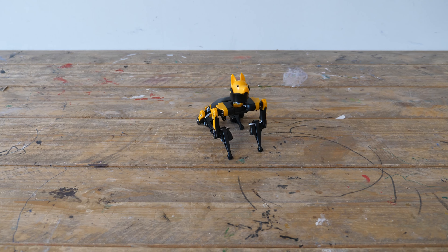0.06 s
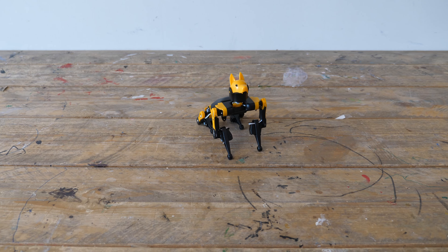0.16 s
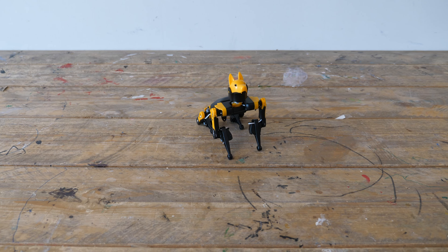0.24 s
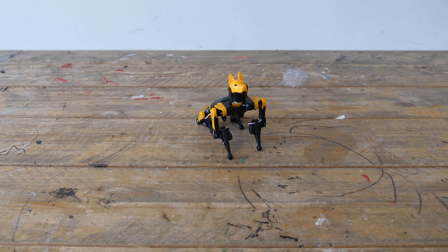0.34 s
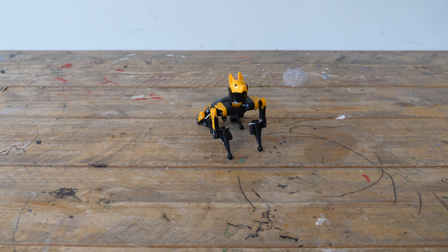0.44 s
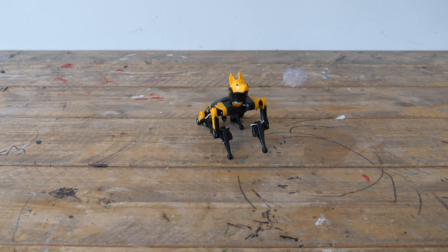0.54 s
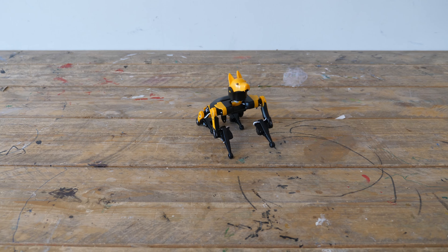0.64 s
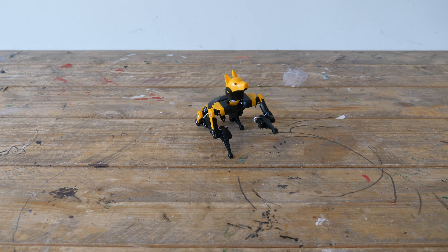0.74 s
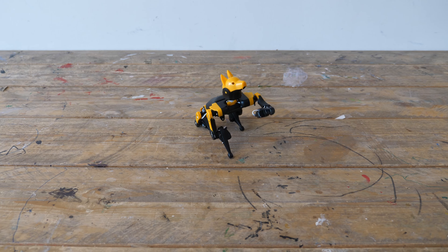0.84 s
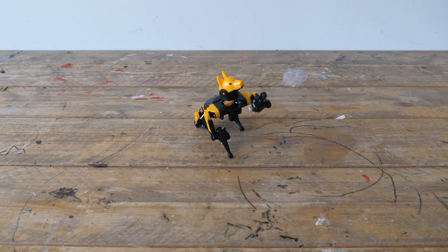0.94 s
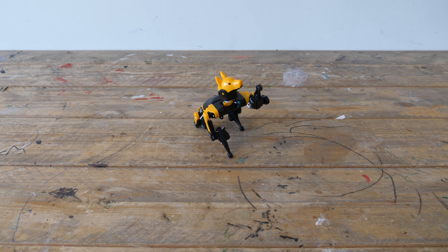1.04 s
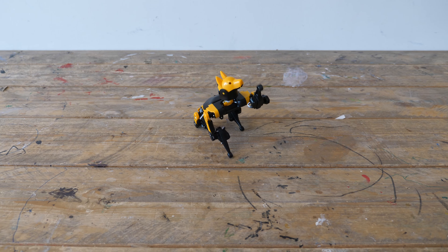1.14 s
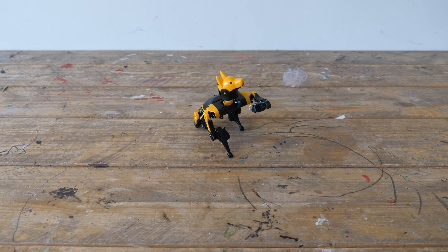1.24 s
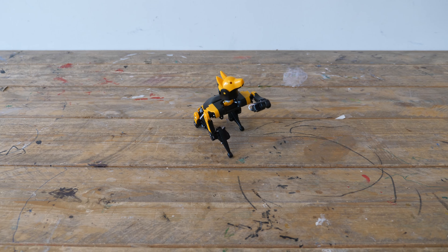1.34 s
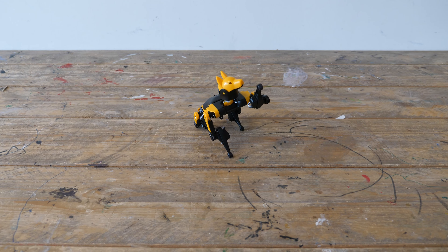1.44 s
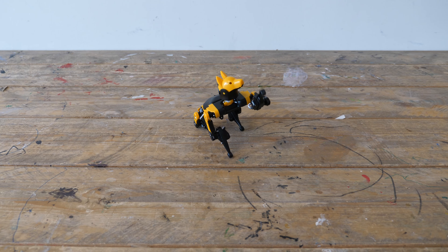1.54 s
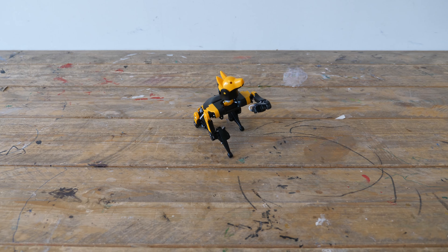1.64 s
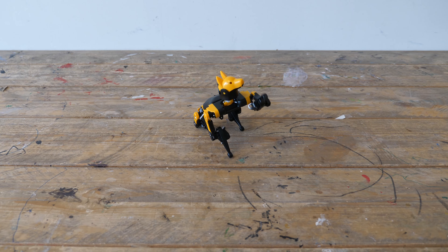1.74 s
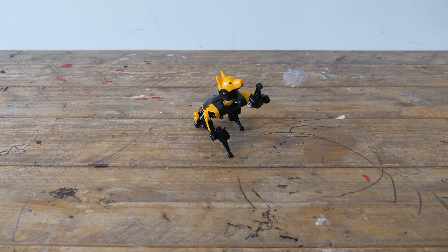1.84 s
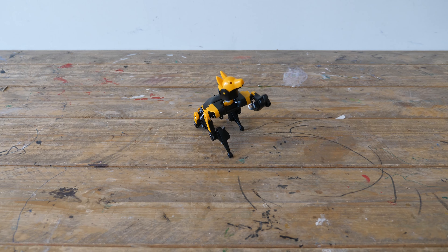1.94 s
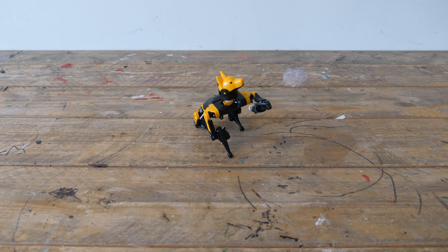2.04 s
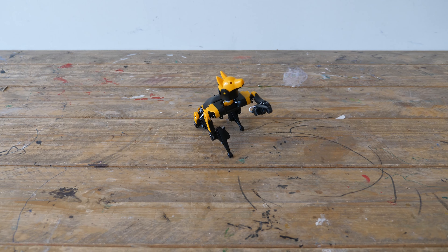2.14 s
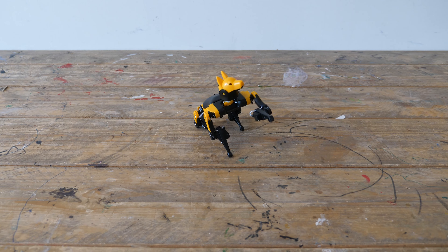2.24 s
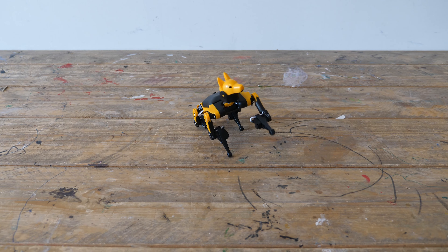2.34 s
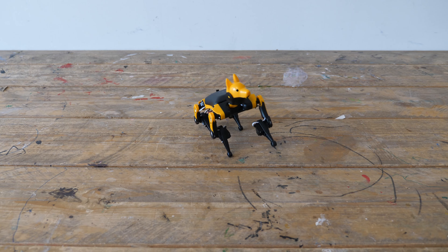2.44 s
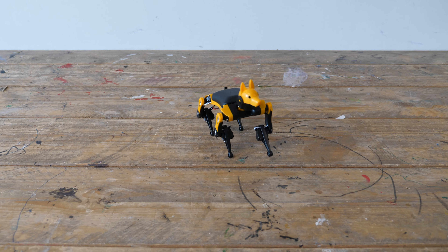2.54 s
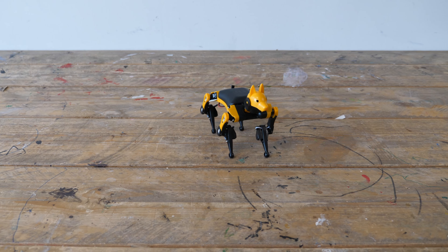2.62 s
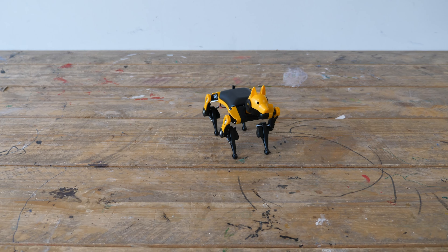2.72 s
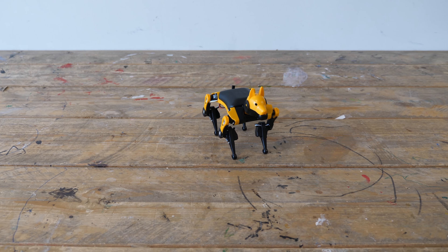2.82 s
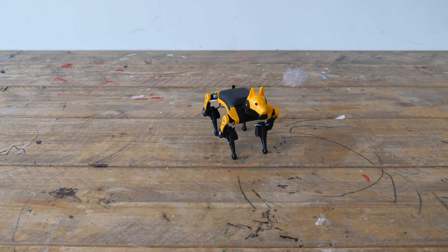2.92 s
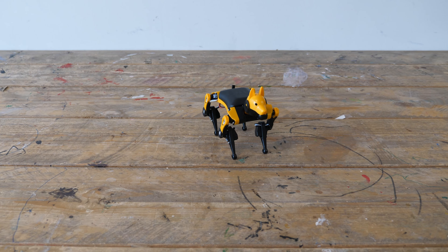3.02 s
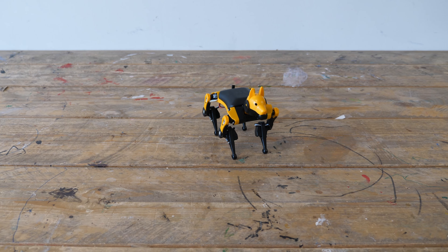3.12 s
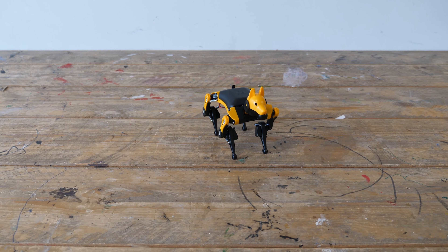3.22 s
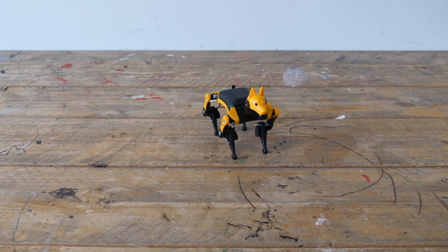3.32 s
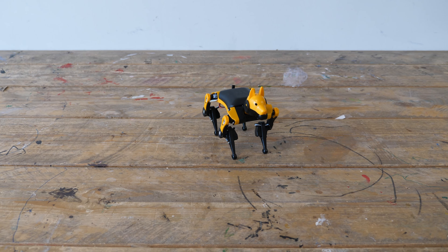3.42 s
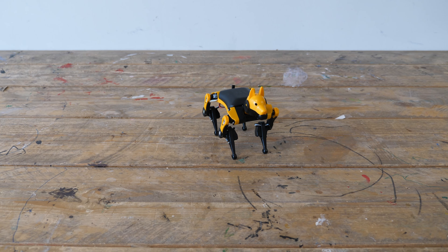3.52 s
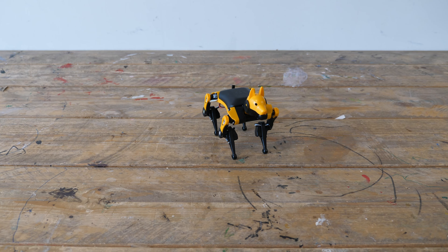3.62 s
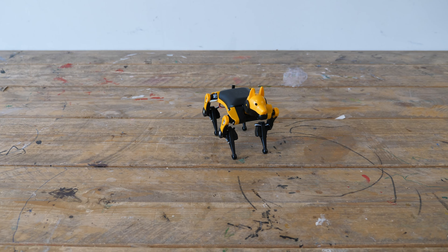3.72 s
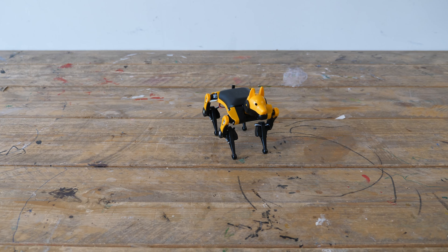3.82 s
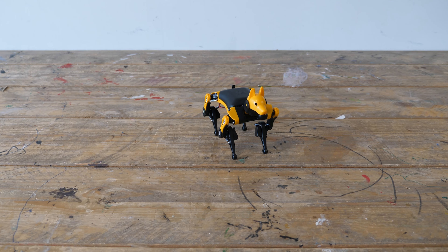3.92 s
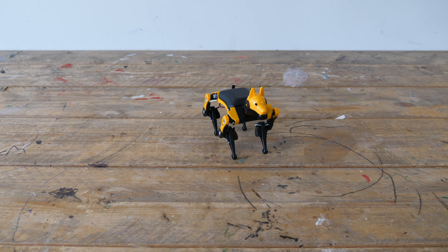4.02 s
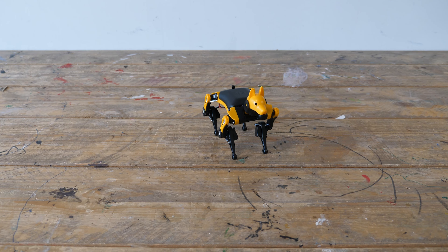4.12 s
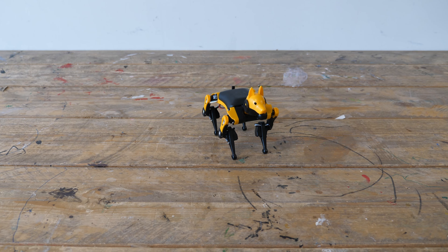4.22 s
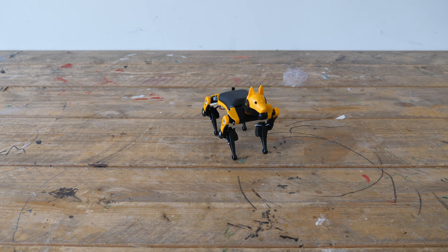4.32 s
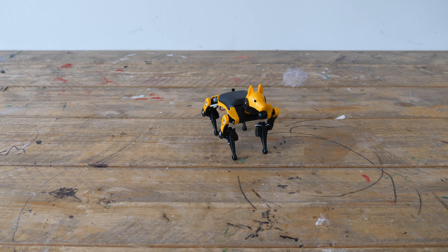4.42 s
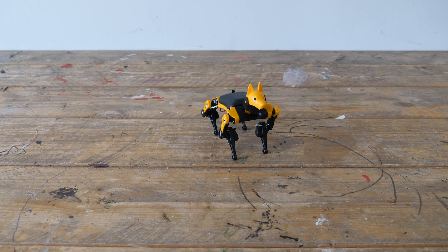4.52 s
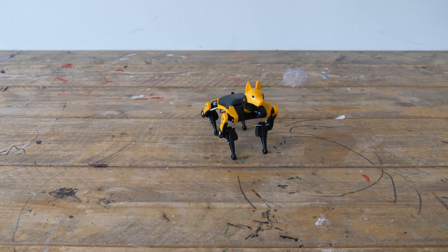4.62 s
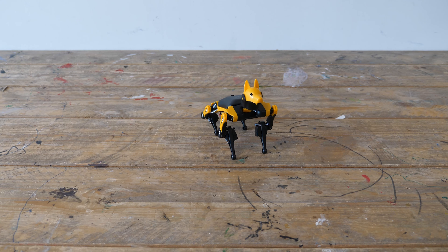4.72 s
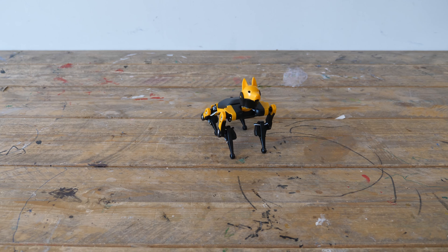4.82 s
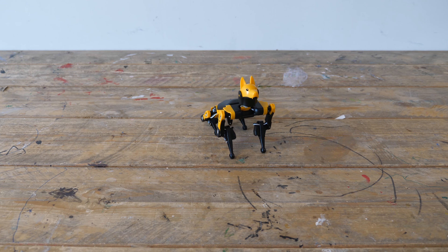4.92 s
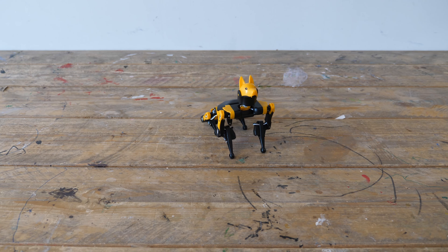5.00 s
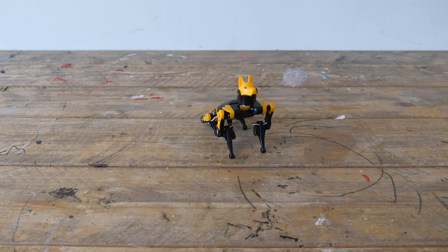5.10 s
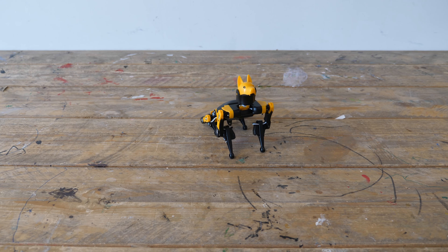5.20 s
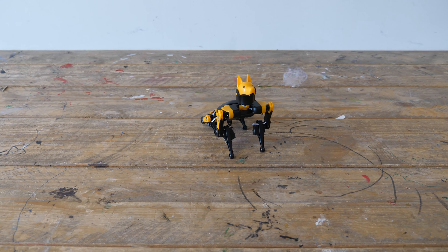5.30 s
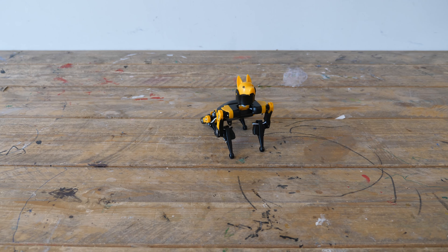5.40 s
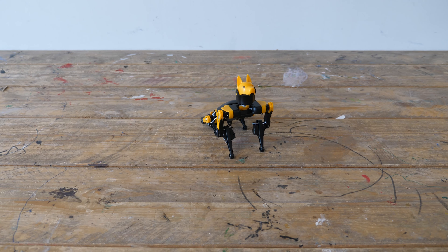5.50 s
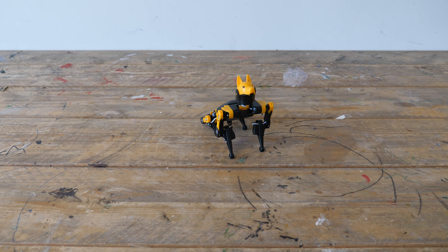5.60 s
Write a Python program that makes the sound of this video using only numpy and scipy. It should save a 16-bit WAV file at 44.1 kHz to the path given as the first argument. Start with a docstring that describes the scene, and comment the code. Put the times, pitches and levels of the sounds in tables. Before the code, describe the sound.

A small robot dog moves on a wooden table in a quiet room. A high, raspy servo whir swells as it lifts a leg, followed by five quick buzzing pulses as it waves. Another whir ends in a rattling knock as its plastic feet land. After a short pause a joint snaps once, and a softer whir with faint foot scuffs follows as it sits back. The sound is centred and fairly dry.

```python
"""A foot stutters faintly over a wooden table, then servos whirr: a small robot dog lifts a front leg,
waves it five times, drops onto all fours and sits back. Gear teeth chatter in plastic housings,
throbbing once a turn, and hum through the frame. Feet scuff and land on the ringing table top,
slack gears tick, a joint snaps once, and the quiet room adds a short tail and a low rumble."""
import sys
import numpy as np
from scipy import signal
from scipy.fft import rfft, irfft
from scipy.io import wavfile

SR = 44100
rng = np.random.default_rng(int(sys.argv[2]) if len(sys.argv) > 2 else 0)


def store_pcm(level_fs):
    """Save levels as 16-bit WAV."""
    pcm = np.round(np.clip(level_fs, -1, 1) * 32767).astype(np.int16)
    wavfile.write(sys.argv[1], SR, np.atleast_2d(pcm).T)


N = 249247
TIME = np.arange(N) / SR


# resonances of the frame standing on the table: pitch_hz, width_hz, level_db
FRAME_MODES = [(64.5, 31, 2.5), (124.5, 22, 8.5), (248, 136, 1), (465, 21, 5.5), (515.4, 5.2, 11.5),
               (666, 52, -12), (834, 44, -6.5), (1074, 50, -3.5), (1338, 15.6, -0.5), (1940, 180, -25)]

def servo(level_db, speed, colour, throb_db, hum_db, whine_db, overtone_db, hum_slope, teeth=24):
    """Gears rattle in the housing, hardest once a turn (speed in turns/s), and shake the frame."""
    size = len(speed)
    turns = np.cumsum(speed * (1 + 0.00816 * drift(60.6, size))) / SR
    tight_spot = np.cos(np.pi * turns) ** 4 * np.sqrt(speed / speed.max())
    flutter_db = 1.36 * drift(170, size)
    throb = rms_one(from_db(throb_db * tight_spot + flutter_db))
    rattle = grains(size, spread_db=2.5)
    mesh_phase = 2 * np.pi * teeth * turns + .6 * drift(110, size)   # uneven teeth blur the tone
    overtones = from_db(overtone_db) * (np.sin(mesh_phase) + np.sin(3 * mesh_phase))
    chatter = cut(coloured((rattle + overtones) * throb * from_db(level_db), colour), 550, "high")
    hum = from_db(hum_db) * rattle + from_db(whine_db) * np.sin(mesh_phase)
    shake = hum * throb * from_db(hum_slope * level_db)
    return chatter + sum(from_db(db) * resonate(shake, hz, width) for hz, width, db in FRAME_MODES)


def move(row, colour, creep_turns_per_s=12, db_per_decade=34, **voicing):
    """A servo runs up, cruises and eases off; its level follows its speed under an uneven load."""
    start, run_up, cruise, run_down, top_speed, db = row
    out, age = np.zeros(N), span(0, run_up + cruise + run_down)
    ease_in = np.sin(np.pi / 2 * ramp(age, run_up))
    ease_out = np.cos(np.pi / 2 * ramp(age - run_up - cruise, run_down)) ** 2
    speed = creep_turns_per_s + (top_speed - creep_turns_per_s) * ease_in * ease_out
    load_db = 1.78 * drift(30, len(age))
    level_db = db + db_per_decade * np.log10(speed / top_speed) + load_db
    add(out, start, servo(level_db, speed, colour, hum_slope=0.56, **voicing))
    return out


# slow leg moves: start_s, run_up_s, cruise_s, run_down_s, top_turns_per_s, level_db
LEG_MOVES = [(0.0, 0.0034, 0.037, 0.32, 41, -56.5), (.462, .36, 0.044, 0.32, 73, -39.5),
             (2.16, .29, .15, 0.33, 59, -40), (4.15, .56, .16, .52, 48, -47.5),
             (5.35, 0.054, 0.0081, 0.085, 28, -62)]
# EQ of the servo housings while lifting, lowering and sitting: frequency_hz, relative_db
LIFT_EQ = [(900, -12), (1800, -17.5), (2300, -16), (3700, -14.5), (4600, -9), (5450, -1), (6550, -11.5),
           (7100, -9.5), (7450, -7), (8100, -1.5), (9100, -11), (11000, -21.5), (13200, -17.5),
           (15800, -24)]
LOWER_EQ = [(900, -7), (1800, -12), (2700, -7.5), (3600, -12.5), (4500, -2.5), (5600, -2.5), (6500, -7.5),
            (7400, -2), (8400, 1), (9600, -10), (10300, -7), (11400, -12), (12700, -6.5), (15800, -11)]
SIT_EQ = [(900, -1), (2100, -9), (2900, 0), (3400, -3.5), (3800, -0.5), (4600, 2.5), (5300, 2.5),
          (6400, -5), (7600, 1.5), (8600, 2.5), (9600, -9.5), (11200, -8.5), (12700, -4), (15800, -13.5)]

def legs():
    """Five slow servo moves; the lifting shoulder binds once a turn and throbs the most."""
    settle, lift, lower, sit, nudge = LEG_MOVES
    return (move(settle, SIT_EQ, throb_db=1, hum_db=-11.5, whine_db=-47, overtone_db=-17)
            + move(lift, LIFT_EQ, throb_db=7, hum_db=-15, whine_db=-32, overtone_db=-15.5)
            + move(lower, LOWER_EQ, throb_db=4, hum_db=-18, whine_db=-31, overtone_db=-26)
            + sum(move(row, SIT_EQ, throb_db=3.5, hum_db=-14.5, whine_db=-31, overtone_db=-22.5)
                  for row in (sit, nudge)))


# strokes of the waving paw: start_s, level_db, run_up_s
PAW_STROKES = [(1.211, -43.5, 0.011), (1.394, -41, .033), (1.577, -42.5, .02), (1.769, -41, .031),
               (1.953, -42.5, 0.021)]
# EQ of the servo housing while waving: frequency_hz, relative_db
WAVE_EQ = [(900, -17.5), (1900, -13), (2900, -11.5), (3500, -14), (4600, -8), (5550, 0), (6550, -14.5),
           (7400, -8.5), (8200, 1.5), (9000, -8.5), (9800, -12), (11200, -10), (13000, -15), (15800, -14)]

def waving(drive_s=.075, brake_s=.012, coast_s=.085, rise_db=12.5, sag_db_per_s=55, fade_db_per_s=274):
    """Each paw stroke swells quickly, sags under drive, brakes and coasts away with a wavering hum."""
    out = np.zeros(N)
    braking, coasting, end = np.cumsum([drive_s, brake_s, coast_s])
    age = span(0, end)
    turns_per_s = np.interp(age, [braking, coasting, end], [58, 21, 20.8])
    fall_db = sag_db_per_s * np.minimum(age, coasting) + fade_db_per_s * np.maximum(age - coasting, 0)
    for start, db, run_up in PAW_STROKES:
        level_db = db - rise_db * (1 - ramp(age, run_up)) - fall_db
        speed = turns_per_s * (1 + .025 * drift(45, len(age)))
        add(out, start, servo(level_db, speed, WAVE_EQ, throb_db=3.5, hum_db=-22.5,
                              whine_db=-37, overtone_db=-27, hum_slope=0.41))
    return out


def foot_contacts(start_s, count=8, first_gap_s=.0013, spread=1.36, hard_hz=5200, soft_hz=950):
    """Landing feet chatter: contacts build as the weight arrives, then spread out, weaken and soften."""
    lags = np.append(0, np.cumsum(first_gap_s * spread ** np.arange(count - 1)))
    level_db = -1 + 5 * ramp(lags, length_s=0.0021) - 480 * lags
    hardness_hz = soft_hz + (hard_hz - soft_hz) * np.exp(-lags / 0.01)
    return list(zip(start_s + lags, level_db, hardness_hz))


# the body rocking back onto its feet: start_s, relative_db, hardness_hz
REBOUND_HITS = [(2.735, -8, 806), (2.758, -20, 600), (2.7815, 0, 880), (2.81, -29, 688)]
# dead knock of a plastic leg: frequency_hz, relative_db
KNOCK_EQ = [(50, -5), (150, 0), (400, 5.5), (900, 9), (1600, -1), (2800, 1.5), (4300, 6), (5500, -24),
            (9000, -20), (16000, 2.5)]

def landing(land_s=2.6768, tip_s=.14, judder_s=.25, fade_db_per_s=102):
    """Feet hit and rebound; the loose frame judders lightly as it tips, then hard on landing."""
    blows, judder = np.zeros(N), np.zeros(N)
    for start, db, hardness_hz in foot_contacts(land_s) + list(REBOUND_HITS):
        add(blows, start, from_db(db) * cut(signal.unit_impulse(SR // 100), hardness_hz, "low"))
    t = span(land_s - tip_s, land_s + judder_s)
    judder_db = np.where(t < land_s, -40.5, -25.5 - fade_db_per_s * (t - land_s))
    rattle = from_db(judder_db) * grains(len(t), spread_db=8.5)
    add(judder, t[0], cut(rattle, 650, "low", order=1))
    knock = coloured(blows + from_db(2) * judder, KNOCK_EQ)
    return from_db(-3) * knock + from_db(-45) * table_top(blows + judder)


# feet stuttering over the wood: start_s, relative_db, pitch_hz, slip_count
FOOT_SCUFFS = [(0.0, -50.5, 780, 5), (.662, -32.5, 940, 1), (1.081, -49.5, 780, 1), (2.193, -47.5, 830, 2),
               (2.536, -38.5, 690, 2), (4.152, -43.5, 780, 1), (4.312, -43.5, 780, 1),
               (4.737, -43.5, 880, 1), (4.853, -50, 880, 1), (5.132, -47.5, 645, 1), (5.221, -46.5, 785, 1),
               (5.424, -51.5, 810, 1)]

def scuffs(slip_s=0.033, gap_s=0.056, loss_db=2, width_hz=215, trim_db=-5):
    """A foot sticks and slips: each train of small impacts rings the leg and pushes on the table."""
    leg_ring, push, age = np.zeros(N), np.zeros(N), TIME[:SR // 8]
    envelope = np.interp(age, [0, .012, slip_s, slip_s + .03], [0.62, 0.81, 0.54, 0.1])
    for start, db, hz, count in FOOT_SCUFFS:
        for k in range(round(count)):
            at = start + k * gap_s
            friction = grains(len(age), spread_db=9.4)
            pressure = from_db(db + trim_db - k * loss_db) * envelope
            squeak = resonate(resonate(friction, hz, width_hz), hz, 2 * width_hz)
            add(leg_ring, at, pressure * rms_one(squeak))
            add(push, at, pressure * rms_one(cut(friction, 420, "low")))
    return leg_ring + from_db(-59) * table_top(leg_ring + from_db(3) * push)


# ring of the wooden table top: pitch_hz, relative_db, t60_s
TABLE_MODES = [(79, -11, 0.37), (121.6, -13, 0.75), (320, 2, 0.56), (475.4, -4.5, 0.25), (517.8, 0, 0.4),
               (648, 8, 0.048), (697, -6.5, 0.32), (761, 3, 0.24), (795, 3.5, 0.14), (829, 5.5, 0.4),
               (878, -3, 0.16), (1050, 11.5, 0.069), (1175, -3.5, 0.21), (1350, 0.5, 0.15),
               (1490, 1.5, 0.067), (1555, 3, 0.098), (1980, -12, 0.12), (2310, -32, 0.061)]

def table_top(force):
    """The boards ring under the feet."""
    return ring_modes(force, TABLE_MODES)


# catches within the snap of a joint: start_s, relative_db
SNAP_CATCHES = [(3.9816, -4), (3.9847, -2.5), (3.9891, -4), (3.9926, -4.5), (3.9937, -4.5)]
# ring of the snapping part: pitch_hz, relative_db, t60_s
JOINT_MODES = [(1870, -24.5, 0.05), (2700, -40, .012), (2840, -27, .012), (3190, 1.5, 0.017),
               (3590, 5, 0.0085), (3740, 8, 0.0069), (4160, -5.5, 0.0055), (5610, -6.5, 0.016),
               (6010, 1, 0.012), (6100, -0.5, 0.0092), (6845, -5.5, 0.0087), (7460, -5.5, 0.013),
               (8770, -9, 0.021)]

def joint_snap(trim_db=-28, grit=0.21):
    """A joint slips over several catches within milliseconds, each setting it ringing."""
    force = np.zeros(N)
    for start, db in SNAP_CATCHES:
        add(force, start, from_db(db) * (signal.unit_impulse(SR // 20) + grit * burst(decay_s=0.0007)))
    snap = cut(ring_modes(force, JOINT_MODES), 720, "high")
    return from_db(trim_db) * cut(snap, 6900, "low", order=4)


# lone ticks of slack gears: start_s, relative_db
GEAR_TICKS = [(.465, -52.5), (1.1877, -54), (2.1588, -52), (2.7137, -48), (2.7282, -33), (2.8966, -50),
              (2.973, -51), (3.035, -48), (3.8806, -56.5), (5.2106, -38.5), (5.4244, -53)]

def backlash(trim_db=2.5):
    """Slack teeth knock together in the housing, in lone ticks and as each paw stroke ends its run-up."""
    out = np.zeros(N)
    stroke_ticks = [(start + run_up, -46) for start, _, run_up in PAW_STROKES]
    for start, db in list(GEAR_TICKS) + stroke_ticks:
        add(out, start, from_db(db + trim_db) * burst(decay_s=0.0013))
    return cut(coloured(out, LOWER_EQ), 1700, "high")


def reverb(x, t60_s=0.32, predelay_s=.006, wet_db=-19):
    """A diffuse tail from the walls follows the direct sound."""
    age = TIME[:SR // 2]
    decay = np.exp(-np.log(1000) * age / t60_s) * (age > predelay_s)
    tail = cut(noise(len(age)) * decay, 8000, "low")
    return x + from_db(wet_db) * signal.oaconvolve(x, tail / np.sqrt(np.sum(tail ** 2)))[:N]


# background bed of the room: frequency_hz, relative_db
ROOM_EQ = [(15, -3.5), (40, 3.5), (120, 2), (240, -1.5), (450, -5.5), (800, -12), (1300, -12.5),
           (1900, -20.5), (2500, -16.5), (3400, -24.5), (6000, -26.5), (16000, -30)]

def room_tone(level_db=-59.5):
    """A faint, steady rumble."""
    return from_db(level_db) * coloured(rng.standard_normal(N), ROOM_EQ)


def from_db(db):
    """Decibels to gain."""
    return 10 ** (np.asarray(db) / 20)


def rms_one(x):
    """Scale to unit power."""
    return x / np.sqrt(np.mean(x ** 2) + 1e-20)


def span(start, end):
    """Sample times from start to end."""
    return TIME[int(max(start, 0) * SR):int(end * SR)]


def ramp(age, length_s):
    """Rise from 0 to 1 and hold."""
    return np.clip(age / max(length_s, 1 / SR), 0, 1)


def add(track, start_s, sound):
    """Mix a sound into a track."""
    at = int(np.clip(start_s * SR, 0, N - 1))
    track[at:at + len(sound)] += sound[:N - at]


def noise(size):
    """White noise from a stream of its own."""
    return np.random.default_rng(rng.integers(2 ** 32)).standard_normal(size)


def drift(rate_hz, size):
    """A smooth random wobble."""
    knots = noise(size // 20)
    return np.interp(TIME[:size] * rate_hz, np.arange(len(knots)), knots)


def grains(size, spread_db):
    """Dense tiny impacts of uneven size, at unit power."""
    return rms_one(noise(size) * from_db(spread_db * np.clip(noise(size), -2, 2)))


def burst(decay_s):
    """A short crack of noise."""
    age = TIME[:SR // 20]
    return noise(len(age)) * np.exp(-age / decay_s)


def coloured(x, eq, size=4096):
    """Minimum-phase EQ with unit power gain."""
    hz, db = np.transpose(eq)
    bin_hz = np.arange(size // 2 + 1) * SR / size
    gain = rms_one(from_db(np.interp(np.log(bin_hz + 1), np.log(hz), db)))
    cepstrum = irfft(np.log(gain))
    cepstrum[1:size // 2] *= 2
    cepstrum[size // 2 + 1:] = 0
    return signal.oaconvolve(x, irfft(np.exp(rfft(cepstrum))))[:len(x)]


def cut(x, hz, kind, order=2):
    """Low- or high-pass."""
    return signal.sosfilt(signal.butter(order, hz, kind, fs=SR, output="sos"), x + 1e-18)


def resonate(x, hz, width_hz):
    """A resonance with unit gain at its peak."""
    r, w = np.exp(-np.pi * width_hz / SR), 2 * np.pi * hz / SR
    return signal.lfilter(np.array([1, 0, -1]) * (1 - r * r) / 2, [1, -2 * r * np.cos(w), r * r], x + 1e-18)


def ring_modes(force, modes):
    """A force rings decaying sines; their alternating signs make each ring swell."""
    out = np.zeros(len(force))
    for k, (hz, db, t60) in enumerate(modes):
        r, w = np.exp(-np.log(1000) / (t60 * SR)), 2 * np.pi * hz / SR
        ring = signal.lfilter([0, np.sin(w)], [1, -2 * r * np.cos(w), r * r], force + 1e-18)
        out += (-1) ** k * from_db(db) * ring
    return out


def scene():
    """The robot, dead centre, over the low rumble of the room."""
    robot = legs() + waving() + scuffs() + landing() + backlash() + joint_snap()
    return np.tile(reverb(robot) + room_tone(), (2, 1))


def record(dry, hiss_db=-88, cutoff_hz=15900):
    """Each channel adds a trace of hiss; the top is cut steeply."""
    hissy = dry + from_db(hiss_db) * rng.standard_normal(dry.shape)
    return signal.sosfilt(signal.ellip(12, .1, 70, cutoff_hz, fs=SR, output="sos"), hissy)


dry = scene()
out = record(dry)
store_pcm(out)
```